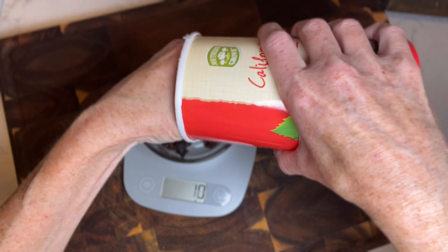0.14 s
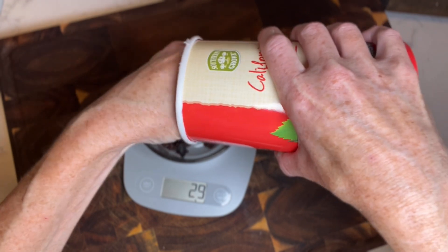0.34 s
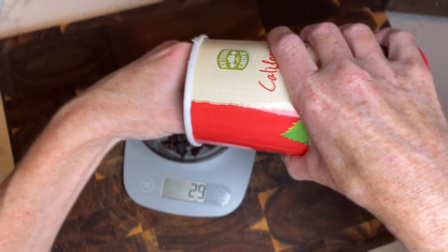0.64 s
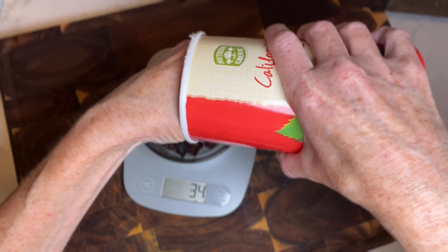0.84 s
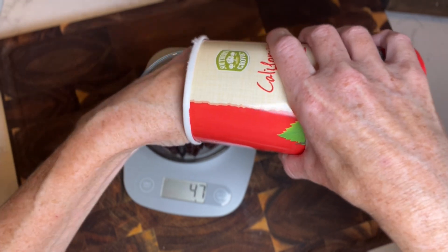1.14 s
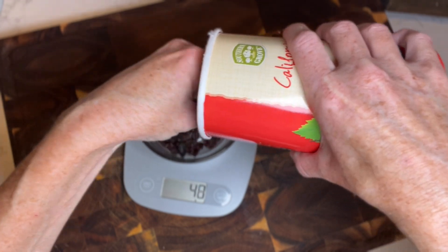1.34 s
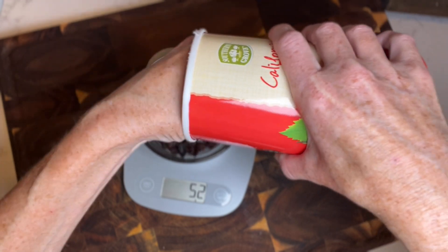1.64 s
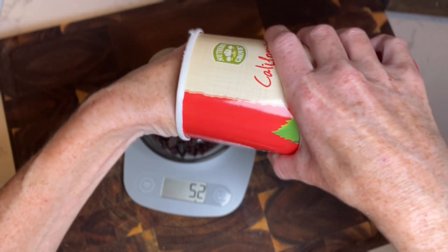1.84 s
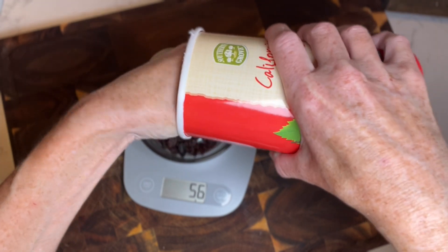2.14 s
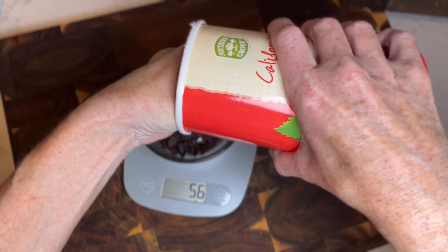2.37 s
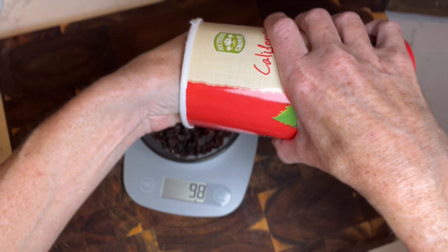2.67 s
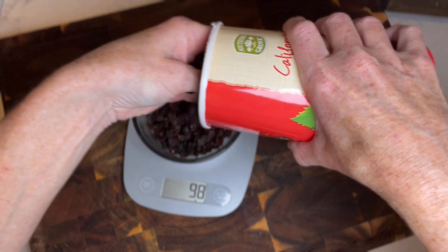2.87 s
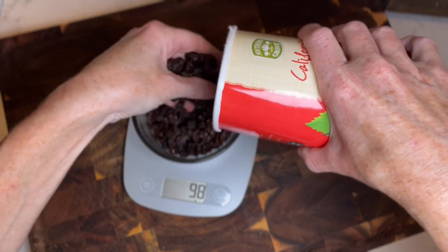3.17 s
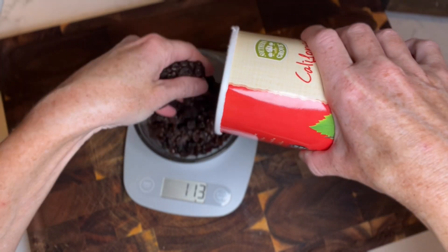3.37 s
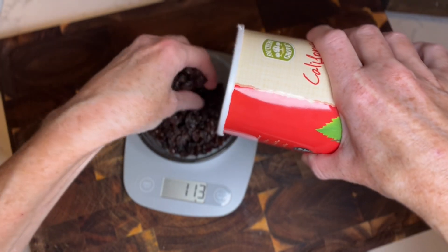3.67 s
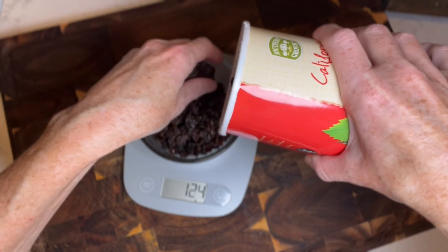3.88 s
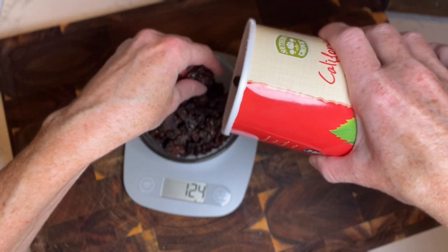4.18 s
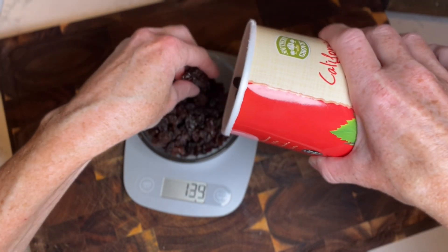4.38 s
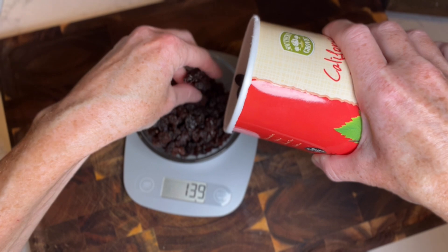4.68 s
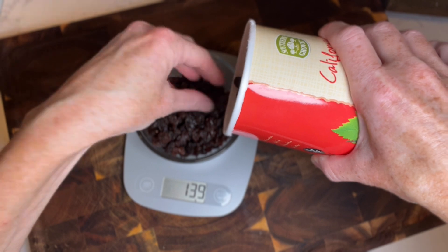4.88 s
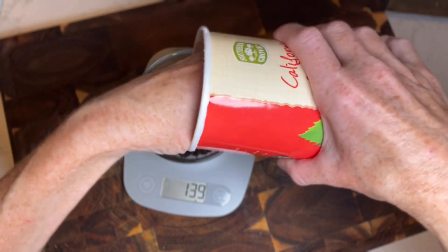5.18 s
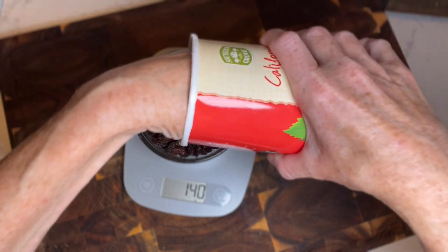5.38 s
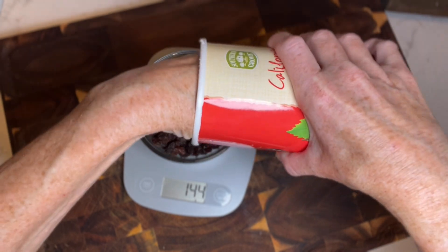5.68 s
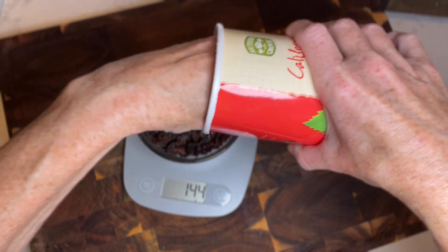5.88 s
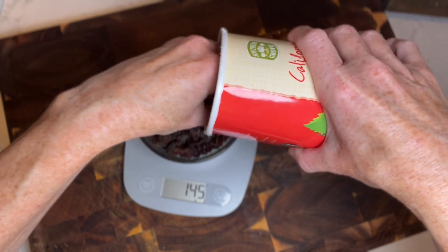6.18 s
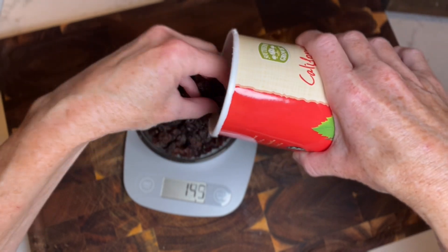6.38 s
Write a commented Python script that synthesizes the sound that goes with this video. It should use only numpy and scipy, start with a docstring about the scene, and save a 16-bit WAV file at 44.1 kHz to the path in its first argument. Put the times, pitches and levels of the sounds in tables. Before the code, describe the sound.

Busy dry rubbing of skin and fruit against card, with boxy knocks and small cracks, fills the first three seconds. The hand then moves over a glass bowl: only tiny soft drops and delicate short rings. At five seconds the rummaging bursts back, easing out at the end with faint pings. Close stereo microphones, low handling rumble, short room tail, quiet kitchen.

```python
"""Fingers dig sticky raisins out of a cardboard canister, close to a pair of microphone ports, over a glass bowl.
Rubbing is grainy friction noise: the card wall carries the lows, skin and fruit hiss above.
Clumps knock on the card, and some raisins thud softly in the bowl: short noise bursts through resonances,
each with a brighter crack. Single raisins ping the glass, whose paired modes ring and beat.
Under it lie the low rumble of the grip, filtered noise, and a quiet kitchen of noise and faint tones."""
import sys
import numpy as np
from scipy import signal
from scipy.fft import rfft, irfft
from scipy.io import wavfile

SR = 44100
rng = np.random.default_rng(int(sys.argv[2]) if len(sys.argv) > 2 else 0)


def unload_audio(sound):
    """Save the sound as a 16-bit wav file, at the path given as the first command line argument."""
    columns = np.transpose(np.atleast_2d(sound))
    # keep every value between -1 and 1, then stretch to whole-number steps
    steps = np.round(np.clip(columns, -1, 1) * 32767)
    wavfile.write(sys.argv[1], SR, steps.astype(np.int16))


N = 287487

# strokes of the fingers along the wall: [start of full pressure t/s, hold t/s, wall level/dB, skin hiss level/dB]
STROKES = [(0.0, 0.143, -51.5, -53.5), (0.215, 0.149, -56.0, -51.5), (0.373, 0.017, -46.0, -43.5),
           (0.57, 0.014, -44.5, -42.0), (0.674, 0.042, -52.0, -49.5), (0.851, 0.104, -50.0, -53.0),
           (1.11, 0.008, -48.0, -47.0), (1.192, 0.093, -51.5, -55.5), (1.421, 0.051, -46.5, -45.5),
           (1.581, 0.112, -49.5, -53.0), (1.777, 0.233, -55.0, -64.0), (1.956, 0.15, -52.5, -53.0),
           (2.216, 0.005, -56.0, -58.0), (2.281, 0.102, -56.0, -59.0), (2.525, 0.01, -63.0, -71.0),
           (2.6, 0.26, -56.5, -52.5), (2.9, 0.035, -52, -55.5), (3.003, 0.097, -60, -64),
           (3.18, 0.02, -67, -82), (3.365, 0.01, -65, -67), (5.01, 0.03, -42.5, -41.5),
           (5.095, 0.02, -53.0, -48.5), (5.196, 0.008, -49.5, -43.0), (5.298, 0.006, -51.5, -45.0),
           (5.406, 0.058, -57.0, -59.0), (5.558, 0.01, -53.0, -57.5), (5.681, 0.091, -55.0, -59.0),
           (5.757, 0.035, -51.0, -46.5), (5.84, 0.035, -51.0, -45.5), (5.905, 0.03, -53.0, -58.0),
           (5.973, 0.093, -49.5, -54.0), (6.092, 0.104, -55.5, -53.0), (6.32, 0.01, -76, -70),
           (6.39, 0.03, -64, -76), (6.5, 0.02, -67, -73)]
# response of skin and fruit, for hiss and cracks: [f/Hz, level/dB]
SKIN = [(1800, -23), (3000, -6.5), (4600, -5.5), (6100, 1.5), (7500, -6.5), (9000, -12.5), (10300, -11.5),
        (12000, -24), (16000, -17)]


def rubbing():
    """Slips come in clumps; the wall carries their lows, skin and fruit hiss above. Rows: two separate draws."""
    _, _, wall_db, skin_db = np.transpose(STROKES)
    clumps_db = 1.4 * drift(25)
    wall = pressure(wall_db, rise_db_per_s=190, fall_db_per_s=170) * amp(clumps_db + 2.33 * drift(40))
    skin = pressure(skin_db, rise_db_per_s=215, fall_db_per_s=225) * amp(clumps_db + .9 * drift(35))

    # single raisins tear free: about 240 ticks a second, each decaying over 1.5 ms
    tears = np.minimum(rng.exponential(1, N), 1.3) * (rng.random(N) < 240 / SR)
    unsticking = signal.lfilter([1], [1, -.985], 0.9 * tears)
    wall_slips = (1 + unsticking) * grains(1200, spread_db=3.2, smooth=1.0)
    skin_slips = (1 + 0.9 * unsticking) * grains(1500, spread_db=2.5, smooth=1.0)

    rows = []
    for wall_slip, skin_slip in zip(wall_slips, skin_slips):
        wall_sound = rms_one(canister(wall_slip, shift_db=2.6))
        hiss = rms_one(colour(patchy(skin_slip, patch_db=1.2), SKIN))
        rows.append(wall * wall_sound + skin * hiss)
    return np.array(rows)


def pressure(level_db, rise_db_per_s, fall_db_per_s):
    """Each stroke swells, holds and fades; overlapping strokes add in power."""
    hand_out_s, hand_in_s, entry_s = 3.6, 4.987, .025   # nothing rubs while the hand is over the bowl
    t = np.arange(0, N / SR + .002, .001)
    power = 0
    for (s, hold_s, *_), db in zip(STROKES, level_db):
        rise_db = rise_db_per_s * np.maximum(s - t, 0)
        fall_db = fall_db_per_s * np.maximum(t - s - hold_s, 0)
        power = power + amp(db - rise_db - fall_db) ** 2
    entry = np.clip((t - hand_in_s) / entry_s, 0, 1)
    gain = np.sqrt(power) * np.where(t < hand_out_s, 1, entry)
    return np.interp(np.arange(N) / SR, t, gain)


def grains(per_s, spread_db, smooth):
    """Tiny uneven slips over smooth friction noise, in two draws that share the slips' times and sizes."""
    slips = rng.random(N) < per_s / SR
    sizes = amp(spread_db * np.minimum(rng.exponential(1, N), 3.5)) * slips
    return rms_one(sizes * rng.standard_normal((2, N))) + smooth * rng.standard_normal((2, N))


def patchy(x, patch_db):
    """Bands of the hiss swell and sink on their own, as different fingers and fruit slide."""
    edges = np.geomspace(1500, 17000, num=8)
    total = 0
    for band in zip(edges, edges[1:]):
        bandpass = signal.butter(2, band, "band", fs=SR, output="sos")
        total = total + amp(patch_db * drift(10.3)) * signal.sosfilt(bandpass, x)
    return total


def knocks():
    """Each knock or thud is a short burst: a pitched ring, the response of the canister, and a crack."""
    # knocks on the card, and from 3.89 to 4.74 s soft thuds of raisins landing in the bowl:
    # [t/s, relative peak level/dB, strongest pitch f/Hz, relative crack level/dB]
    hits = [(0.0612, -38, 620, -43), (0.0812, -36, 680, -39), (0.136, -35, 1080, -37),
            (0.2025, -33, 560, -45), (0.258, -40, 330, -55), (0.269, -48.5, 700, -39),
            (0.356, -27.5, 1100, -38), (0.391, -26, 1110, -32.5), (0.421, -45, 1900, -43),
            (0.428, -36, 640, -50), (0.441, -32.5, 1150, -44), (0.462, -44, 1900, -50),
            (0.518, -48, 1900, -43), (0.564, -36, 1120, -38), (0.580, -29, 560, -32),
            (0.595, -36, 1180, -45), (0.688, -48, 1900, -38), (0.7098, -23, 1400, -27),
            (0.816, -42, 700, -47), (0.842, -35, 1600, -41), (0.872, -36.5, 1160, -40.5),
            (0.899, -37.5, 920, -43.5), (0.915, -46, 1900, -42), (0.952, -37.5, 1100, -45),
            (0.984, -46, 900, -53), (0.999, -42, 495, -54), (1.048, -44, 800, -54),
            (1.1105, -17, 1850, -42), (1.149, -39, 950, -61), (1.156, -39, 950, -61),
            (1.178, -38, 1500, -58), (1.21, -46, 1500, -45), (1.23, -35.5, 1090, -45),
            (1.291, -30, 1150, -39), (1.338, -43, 1150, -61), (1.37, -46, 1500, -45),
            (1.397, -35, 1060, -43), (1.417, -46, 1900, -43), (1.481, -18.5, 1120, -28.5),
            (1.5625, -33, 900, -42), (1.642, -31.5, 464, -40), (1.682, -32, 510, -38.5),
            (1.74, -29, 1570, -73), (1.795, -40, 474, -55), (1.874, -22.5, 1180, -34),
            (1.9455, -17.5, 1600, -26), (1.956, -29, 1500, -36), (1.978, -46, 1900, -47),
            (2.007, -36, 500, -46), (2.022, -38, 230, -60), (2.041, -44, 500, -47), (2.077, -50, 1900, -45),
            (2.108, -39, 470, -59), (2.201, -34, 2070, -42.5), (2.2133, -21.5, 920, -32),
            (2.248, -38, 519, -59), (2.277, -39, 1960, -50), (2.378, -40, 790, -73),
            (2.742, -37, 1160, -49), (2.799, -37, 1500, -55), (2.803, -36, 540, -60), (2.82, -38, 750, -60),
            (2.826, -42, 2100, -50), (2.834, -37, 600, -60), (2.848, -39, 600, -55),
            (2.8555, -15.5, 520, -30), (2.878, -36, 560, -60), (2.907, -36, 1950, -42),
            (2.926, -38, 540, -50), (2.9962, -30, 2200, -30), (2.999, -25, 950, -40),
            (3.086, -30, 700, -39), (3.255, -70, 400, -62.5), (3.338, -33.5, 900, -42.5),
            (3.509, -43, 990, -91), (3.894, -55, 900, -66), (3.908, -58, 1750, -64),
            (3.947, -62, 1750, -65), (3.985, -55, 520, -64), (4.088, -80, 1700, -74),
            (4.229, -63, 1400, -78), (4.395, -65, 651, -78), (4.737, -85, 1700, -71),
            (4.990, -32, 190, -58), (5.008, -28, 300, -33), (5.035, -30.5, 474, -33),
            (5.056, -34, 450, -45), (5.185, -40, 1900, -43), (5.202, -28, 376, -33),
            (5.241, -38, 1980, -40), (5.314, -28, 1910, -32), (5.316, -36, 400, -55),
            (5.425, -36, 1800, -49), (5.468, -46, 490, -49), (5.524, -41.5, 1880, -53.5),
            (5.616, -46, 1100, -56), (5.641, -46, 700, -56), (5.667, -40, 500, -50), (5.676, -34, 413, -40),
            (5.746, -36, 460, -40), (5.783, -40, 280, -42), (5.806, -42, 1000, -50), (5.83, -48, 1900, -43),
            (5.9455, -29.5, 560, -43), (5.967, -42, 1700, -47), (6.032, -37.5, 519, -42.5),
            (6.062, -24, 1250, -33), (6.145, -42, 1150, -55), (6.16, -44, 500, -47),
            (6.189, -38, 1130, -44.5), (6.233, -40.5, 505, -54), (6.311, -62, 347, -59),
            (6.366, -51.5, 1650, -69)]
    contact_s = .0008   # time constant of the rise
    hard_t60_s, hard_db, softer_s_per_db = .022, -18, .0005   # the softer the knock, the longer it smears
    lowest_share = .45   # lowest pitch a knock drives, as a share of its own
    snap, snap_t60_s = 1.7, .004   # sharp opening of the crack: weight and decay

    rings, blows, cracks = np.zeros((3, 2, N + 4096))
    t = np.arange(4096) / SR
    noise = rng.standard_normal((len(hits), 2, 2, 4096))
    for (s, peak_db, hz, crack_db), (low, high) in zip(hits, noise):
        t60 = np.clip(hard_t60_s + softer_s_per_db * (hard_db - peak_db), .004, .1)
        fall = (1 - np.exp(-t / contact_s)) * amp(-60 * t / t60)
        burst = low * fall
        at = round(s * SR)
        span = slice(at, at + 4096)

        ring = resonate(resonate(burst, hz, .36 * hz), hz, 1.6 * hz)
        rings[:, span] += amp(peak_db) * ring / np.abs(ring).max(axis=1, keepdims=True)
        # a stiff spot leaves the low modes still
        stiff = signal.butter(2, lowest_share * hz, "high", fs=SR, output="sos")
        blows[:, span] += amp(peak_db) * signal.sosfilt(stiff, burst)
        cracks[:, span] += amp(crack_db) * high * (fall ** 1.3 + snap * amp(-60 * t / snap_t60_s))

    soft = signal.butter(4, 2350, fs=SR, output="sos")   # soft fruit puts little treble into the wall
    rows = []
    for ring, blow, crack in zip(rings[:, :N], blows[:, :N], cracks[:, :N]):
        body = canister(signal.sosfilt(soft, blow), shift_db=2.5)
        rows.append(amp(-5) * ring + amp(5) * body + amp(8.5) * colour(crack, SKIN))
    return np.array(rows)


def canister(x, shift_db):
    """The card wall and the air inside answer any contact; a moving hand damps now one resonance, now another."""
    # air and wall resonances: [f/Hz, width f/Hz, mean level/dB]
    resonances = [(290, 60, -15), (516.4, 44, 5), (663, 35, -8.5), (825, 40, 1.5), (1145, 40, -1.5),
                  (1530, 40, -6), (1880, 45, -2.5), (1980, 38, 0), (2342, 31, -12.5), (3430, 90, -17)]
    # response of the wall between resonances: [f/Hz, level/dB]
    wall_response = [(90, -18), (150, -8), (280, -7), (500, -1.5), (1200, -3.5), (2300, -4.5),
                     (3000, -16.5), (4500, -15), (7000, -23.5)]
    # how freely the air column rings as the hand clears the mouth: [t/s, added level/dB]
    mouth_curve = [(0, 0), (1.0, -2), (2.5, -2), (2.8, 4), (3.4, 4), (5.0, 0), (5.75, -1), (5.9, 6),
                   (6.1, 5), (6.3, 1), (6.52, 0)]
    mouth_db, = in_time(mouth_curve)
    total = colour(x, wall_response)
    for k, (hz, width_hz, level_db) in enumerate(resonances):
        gain_db = level_db + shift_db * drift(14.0)
        if k == 1:   # the air mode that the mouth frees
            gain_db = gain_db + mouth_db
        total = total + (-1) ** k * amp(gain_db) * resonate(x, hz, width_hz)   # neighbours in opposite sign
    return total


def glass():
    """Soft fruit sets four pairs of bowl modes ringing and beating, each leaning by its own amount to the left."""
    # raisins striking the glass: [t/s, relative level/dB of mode 1, 2, 3, 4]
    pings = [(0.7614, -52, -72, -69, -74), (0.816, -55, -84, -59, -83), (3.1168, -55, -72, -64, -71),
             (3.1444, -82, -70, -83, -71), (3.2984, -69, -84, -69, -91), (3.3727, -62, -58, -64, -64),
             (3.888, -66, -72, -74, -100), (3.895, -60, -69, -74, -100), (3.909, -57, -54.5, -55, -64),
             (3.9474, -61, -61, -63, -54), (3.9782, -63, -82, -57, -84), (3.9873, -47.5, -65, -71, -82),
             (4.232, -76, -82, -80, -95), (4.4, -85, -80, -81, -84), (4.84, -78, -80, -78, -82),
             (4.903, -56.5, -76, -79, -82), (6.02, -53, -56, -61, -70), (6.3914, -64, -70, -82, -88),
             (6.47, -54.5, -56, -49, -53.5)]
    # bowl modes: [f/Hz, decay by 60 dB t/s, split of the pair f/Hz]
    modes = [(1718, 0.165, 13.6), (3430, 0.21, 15), (5675, 0.14, 7.3), (8466, 0.12, 21)]
    # left minus right for each mode: [level/dB]
    pans_db = [11, 11, 2.3, 6]
    touch_s, touch_rough, waver_db = .003, 1.3, 3.0   # settling fruit roughens the strike, damps unevenly

    rows, out = np.array(pings), np.zeros((2, N))
    # the mix within each pair of modes varies at random from ping to ping
    shares = rng.uniform(0, 0.36, (len(rows), len(modes)))
    t = np.arange(256) / SR
    # soft fruit presses for a moment
    press = np.sin(np.pi * np.minimum(t / touch_s, 1)) * np.pi / (touch_s * SR)
    touches = press * (1 + touch_rough * rng.standard_normal((len(rows), 256)))
    places = (rows[:, :1] * SR).astype(int) + np.arange(256)

    for k, ((hz, t60, split_hz), pan_db) in enumerate(zip(modes, pans_db)):
        sides = amp([[pan_db / 2], [-pan_db / 2]])
        for pitch, share in ((hz, 1 - shares[:, k]), (hz + split_hz, shares[:, k])):
            strikes = np.full(N + 256, 1e-18)   # tiny offset keeps the filter out of denormal numbers
            weights = (share * amp(rows[:, k + 1]))[:, None]
            strikes[places] = weights * touches * np.cos(2 * np.pi * pitch * t)
            r, w = amp(-60 / (t60 * SR)), 2 * np.pi * pitch / SR
            ring = signal.lfilter([0, np.sin(w)], [1, -2 * r * np.cos(w), r * r], strikes[:N])
            out += ring * amp(waver_db * drift(30)) * sides
    return out


def grip_rumble():
    """The holding hand sends low noise whose level rises and falls. Rows: two separate draws."""
    # level of the rumble: [t/s, level/dB]
    rumble_curve = [(0.0, -60), (0.22, -58), (0.31, -69), (0.83, -60), (1.2, -74), (1.34, -53), (1.36, -61),
                    (1.61, -65), (1.72, -50), (2.03, -59), (2.94, -70), (2.98, -62), (3.23, -74),
                    (3.49, -64), (3.83, -73), (3.96, -56), (4.1, -73), (4.96, -72), (5.08, -52), (5.5, -64),
                    (5.54, -73), (5.66, -50), (5.85, -52), (5.97, -66), (6.03, -53), (6.06, -62),
                    (6.25, -53), (6.32, -66), (6.43, -59), (6.52, -72)]
    # response of the grip: [f/Hz, level/dB]
    grip_response = [(18, -14), (30, -10), (45, 4.5), (62, 3.5), (90, -4.5), (140, -12.5), (250, -43.5)]
    level_db, = in_time(rumble_curve)
    noise = np.array([colour(x, grip_response) for x in rng.standard_normal((2, N))])
    return amp(level_db) * rms_one(noise)


def kitchen_air():
    """A quiet kitchen: coloured noise that swells a little, with narrow noise tones that come and go."""
    # spectrum of the kitchen: [f/Hz, level/dB per Hz]
    kitchen_spectrum = [(70, -24), (130, 8), (220, -1), (450, -6), (1100, -19), (1650, -9), (2300, -17),
                        (3400, -17.5), (6000, -17.5), (10000, -15), (16000, -31)]
    # faint narrow tones: [f/Hz, width f/Hz, mean level/dB, waver level/dB]
    faint_tones = [(4500, 90, -99, 3.5), (470, 60, -90, 3.0), (1650, 120, -88, 2.5)]
    noise = np.array([colour(x, kitchen_spectrum) for x in rng.standard_normal((2, N))])
    total = amp(-73.3 + 1.2 * drift(4)) * rms_one(noise)
    for hz, width_hz, level_db, waver_db in faint_tones:
        tone = resonate(resonate(rng.standard_normal((2, N)), hz, width_hz), hz, width_hz)
        total = total + amp(level_db + waver_db * drift(3.5)) * rms_one(tone)
    return total


def room_tail(close):
    """Short reverberation: each row convolved with its own dying noise."""
    return np.array([signal.fftconvolve(x, dying_noise(.18))[:N] for x in close])


def dying_noise(t60):
    """Noise that dies away by 60 dB in t60 seconds; energy 1."""
    t = np.arange(SR // 2) / SR
    tail = rng.standard_normal(len(t)) * amp(-60 * t / t60)
    return tail / np.sqrt(np.sum(tail ** 2))


def spread(direct, separate):
    """Left and right differ by separately drawn noise with its own spectrum, plus a lean to the left."""
    # level of the separate noise in the difference of left and right: [f/Hz, level/dB]
    separate_response = [(30, -30), (80, -20), (170, -12), (500, -11), (1400, -8), (3000, -6), (4600, -9),
                         (5600, -28), (7800, -28), (9000, -7), (12000, -5)]
    # share of the direct sound in the difference: [f/Hz, level/dB]
    lean_response = [(150, -51.5), (450, -16), (1100, -14.5), (2500, -24.5), (5000, -45)]
    side = colour(separate, separate_response) + colour(direct, lean_response)
    return np.array([direct + side, direct - side])


def amp(db):
    """Decibels to gain."""
    return 10 ** (np.asarray(db) / 20)


def rms_one(x):
    """Scale to rms 1."""
    return x / np.sqrt(np.mean(x ** 2) + 1e-20)


def in_time(rows):
    """Columns of a curve table, one value per sample."""
    s, *columns = np.transpose(rows)
    return [np.interp(np.arange(N) / SR, s, c) for c in columns]


def colour(x, spectrum):
    """Causal filter with the given (Hz, dB) response, minimum phase by the folded cepstrum."""
    hz, level_db = np.transpose(spectrum)
    grid = np.maximum(np.arange(4097) * SR / 8192, 1)
    response_db = np.interp(np.log(grid), np.log(hz), level_db)
    cepstrum = irfft(np.log(amp(response_db)))
    cepstrum[1:4096] *= 2
    cepstrum[4097:] = 0
    impulse = irfft(np.exp(rfft(cepstrum)))
    return signal.fftconvolve(x, impulse)[:len(x)]


def resonate(x, hz, width_hz):
    """One resonance with gain 1 on top."""
    r = np.exp(-np.pi * width_hz / SR)
    poles = [1, -2 * r * np.cos(2 * np.pi * hz / SR), r * r]
    return signal.lfilter([(1 - r * r) / 2, 0, (r * r - 1) / 2], poles, x)


def drift(rate):
    """Slow chance with spread 1 and a corner at rate in Hz, drawn at every 32nd sample."""
    r = np.exp(-64 * np.pi * rate / SR)
    draws = rng.standard_normal(N // 32 + 702)
    slow = signal.lfilter([1], [1, -2 * r, r * r], draws)[700:]   # drop the filter's run-in
    return np.interp(np.arange(N) / 32, np.arange(len(slow)), rms_one(slow))


def scene():
    """Canister, grip and kitchen through the ports, with the bowl and a short room tail."""
    close = rubbing() + knocks()
    close = close + amp(-14) * room_tail(close)
    direct, separate = close + grip_rumble() + kitchen_air()
    return spread(direct, separate) + glass()


def record(dry):
    """Peaks are rounded; the common part of both channels ends lower, above it only their difference is heard."""
    top = 0.09   # height towards which the recorder rounds peaks
    left, right = top * np.tanh(dry / top)
    common_lowpass = signal.cheby2(10, 45, 10750, fs=SR, output="sos")
    common = signal.sosfilt(common_lowpass, left + right) / 2
    side = (left - right) / 2
    final_lowpass = signal.cheby2(14, 70, 15600, fs=SR, output="sos")
    return signal.sosfilt(final_lowpass, [common + side, common - side])


dry = scene()
out = record(dry)
unload_audio(out)
```